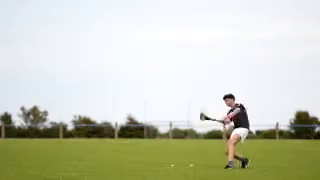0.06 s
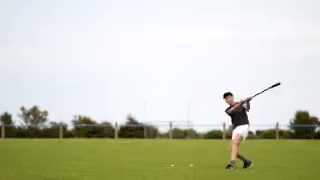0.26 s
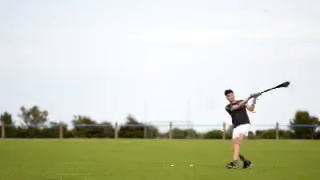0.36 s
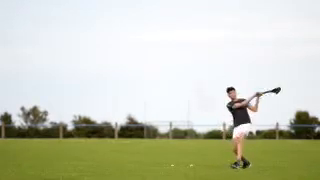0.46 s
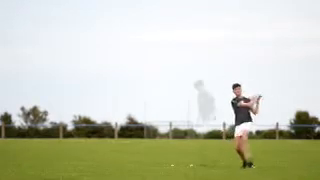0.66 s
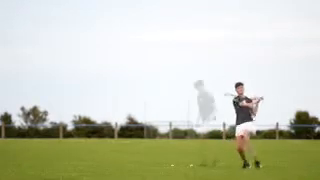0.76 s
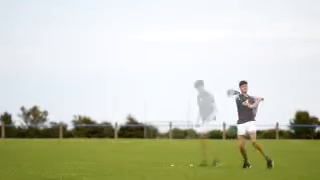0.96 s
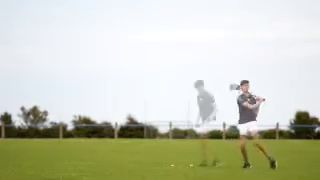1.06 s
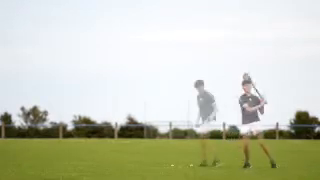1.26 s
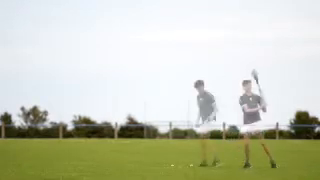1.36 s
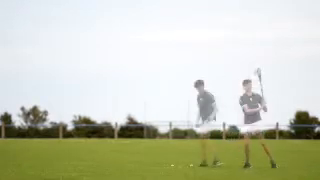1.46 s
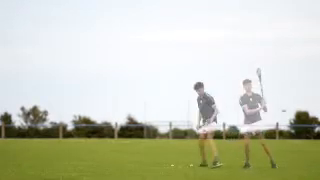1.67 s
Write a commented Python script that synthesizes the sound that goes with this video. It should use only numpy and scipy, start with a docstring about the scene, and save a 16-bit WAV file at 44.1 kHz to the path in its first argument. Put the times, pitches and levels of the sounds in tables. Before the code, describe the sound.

On an open field, a loud, close crack sounds as a stick strikes a ball, trailed by small ticks and a soft swish of echo. A faint breeze continues, now and then rumbling on the microphone.

```python
"""Stick and ball on an open field

Close to the microphone, a wooden stick swings and hits a ball. The dry crack, a sharp pulse with a
brief ring of wood, comes twice in quick succession. Ticks, soft knocks and steps follow on the grass,
and the far hedge scatters the crack back as a soft swish. Light wind blows throughout and now and
then buffets the microphone."""
import sys
import numpy as np
from scipy import signal
from scipy.fft import rfft, irfft
from scipy.io import wavfile

SR = 44100
rng = np.random.default_rng(int(sys.argv[2]) if len(sys.argv) > 2 else 0)


def store_wav(level_fs):
    """Save 16-bit WAV to argv[1]."""
    pcm = np.round(np.clip(np.atleast_2d(level_fs), -1, 1) * 32767)
    wavfile.write(sys.argv[1], SR, pcm.T.astype(np.int16))


N = 74970

# Colours of the wind. Each row: frequency in Hz, relative level in dB.
AIR_SPECTRUM = [(20, -16), (60, -1.5), (120, -4.5), (190, -10), (320, -7.5), (500, -13), (800, -15.5),
                (1250, -12), (1700, -18), (2600, -18.5), (3800, -20.5), (6000, -23), (7200, -33),
                (8500, -35.5), (11000, -32.5), (15200, -34.5), (16000, -55.5)]
SWELL_SPECTRUM = [(150, -19), (500, 1.5), (1300, 0), (2200, -29), (6000, -27)]
BUFFET_SPECTRUM = [(15, -14), (35, -4), (55, 1.5), (90, -3.5), (150, -10), (250, -22.5), (600, -47),
                   (3000, -88)]
# How alike the wind is on both sides. Each row: frequency in Hz, left-right correlation.
AIR_LIKENESS = [(30, .3), (120, 0.6), (300, .8), (600, 0.7), (1200, .2), (4000, 0.039), (15000, .1)]
# Strength of the breeze. Each row: time in seconds, gain in dB.
BREEZE_CURVE = [(0, 1), (.6, 1.5), (1, 2), (1.1, 1.5), (1.35, 0.5), (1.55, 0.5), (1.7, 2)]
# Wind on the microphone. Each row: centre and half length in seconds, level and left minus right in dB.
MIC_BUFFETS = [(0.122, 0.02, -63, 30), (0.342, 0.023, -60, -5.5), (0.444, 0.0093, -48, 20),
               (0.586, 0.012, -54, -31), (0.698, 0.022, -49, -22), (0.798, 0.014, -63, -12),
               (1.28, .015, -56.5, 3), (1.447, 0.048, -55.5, -24), (1.631, 0.058, -62.5, 2)]
# Colours of the close sounds. Each row: frequency in Hz, relative level in dB.
WHOOSH_SPECTRUM = [(40, -11), (90, -5), (150, -1), (260, -3), (500, -19), (1500, -36), (8000, -62.5)]
CONTACT_SPECTRUM = [(40, 0.5), (220, 9.5), (400, 7), (620, 0), (900, -12), (1300, -2.5), (1700, 5),
                    (2400, 13.5), (3300, 20), (4300, 11.5), (5200, 18), (6600, 15), (8400, 6.5),
                    (10500, -2.5), (12600, -12.5), (14200, -24.5), (16000, -35)]
SNAP_SPECTRUM = [(1000, -34), (3800, -21), (4700, -1), (6500, 3), (8500, -8), (12000, -9), (15000, -27)]
SCUFF_SPECTRUM = [(200, -24), (500, 7), (900, -6), (2000, 5.5), (3600, 2), (5000, 1), (6500, -5.5),
                  (9000, -14), (15000, -30)]
# Stereo lean of the crack. Each row: frequency in Hz, left minus right in dB.
CONTACT_BALANCE = [(100, 3.5), (2000, -0.5), (3600, 2.5), (5200, 2.5), (6300, -4.5), (8500, 0), (10300, 8),
                   (11800, 11), (14000, -3)]
# High pings. Each row: centre in seconds, pitch in Hz, half length in seconds, level in dB,
# left minus right in dB.
HIGH_PINGS = [(.2515, 5450, .0011, -36.5, -4), (1.536, 4750, 0.0013, -52, -4)]
# Ticks and snaps. Each row: time in seconds, level in dB, left minus right in dB.
SHARP_TICKS = [(0.2585, -27, -11), (.2727, -26, 10.5)]
BRIGHT_SNAPS = [(0.331, -52, -4), (0.486, -53.5, 3), (.501, -50, 14), (1.536, -61, -3.5)]
# Colours of the hedge's swish and its bright front. Each row: frequency in Hz, relative level in dB.
SWISH_SPECTRUM = [(150, 4), (400, 0), (900, -0.5), (1600, 0), (2600, 3), (4300, 3.5), (5400, 7), (6700, -1),
                  (8500, -10), (11000, -18), (15000, -33)]
SIZZLE_SPECTRUM = [(1000, -35), (4400, -10), (5300, 6), (6600, 3), (8500, -14.5), (10500, -24),
                   (15000, -38)]
# Returns from the hedge. Each row: start, rise and time to fall 60 dB, all in seconds, then level in dB.
HEDGE_ECHOES = [(0.284, 0.01, 0.49, -55.5), (0.384, 0.07, 0.98, -48), (0.691, 0.026, 0.23, -56.5)]
# Low knocks. Each row: centre in seconds, level in dB.
SOFT_KNOCKS = [(0.3474, -35), (.355, -47), (0.362, -48), (0.3773, -47), (0.3989, -45), (0.4167, -43.5)]
# Scuffs on the grass. Each row: centre and half length in seconds, level in dB.
GRASS_SCUFFS = [(0.347, .0015, -44), (1.391, 0.02, -59)]
# The player's steps. Each row: centre and half length in seconds, level and left minus right in dB.
STEPS = [(0.696, .016, -49, -19), (1.196, .012, -54, -12)]

TIME, FREQS = np.arange(N) / SR, np.fft.rfftfreq(N, 1 / SR)


def amp(db):
    return 10 ** (np.asarray(db) / 20)


def unit_rms(x):
    return x / np.sqrt(np.mean(x ** 2) + 1e-20)


def curve_at(points, hz):
    """Joins points on a log-frequency axis."""
    freqs, values = np.transpose(points)
    return np.interp(np.log(hz + 1), np.log(freqs + 1), values)


def pan(db):
    """Left and right gains of constant power."""
    return unit_rms(amp([[db / 2], [-db / 2]]))


def add(mix, start_s, sound):
    part = mix[:, round(start_s * SR):][:, :sound.shape[1]]
    part += sound[:, :part.shape[1]]


def bell(centre_s, width_s):
    return np.exp(-((TIME - centre_s) / width_s) ** 2 / 2)


def blip(centre_s, hz, width_s, db):
    """A cosine under a bell-shaped envelope."""
    return -amp(db) * bell(centre_s, width_s) * np.cos(2 * np.pi * hz * (TIME - centre_s))


def drift(seconds):
    """Smooth random wander of rms 1."""
    smoothing = np.exp(-(FREQS * seconds) ** 2) * (FREQS > 0)
    return unit_rms(irfft(rfft(rng.standard_normal(N)) * smoothing, N))


def noise(spectrum, likeness):
    """Stereo noise of a given colour and left-right correlation."""
    left, other = rfft(rng.standard_normal((2, N)))
    right = likeness * left + np.sqrt(1 - likeness ** 2) * other
    return unit_rms(irfft(np.array([left, right]) * amp(curve_at(spectrum, FREQS)), N))


def notch(x, hz, width_hz):
    return signal.lfilter(*signal.iirnotch(hz, hz / width_hz, SR), x)


def wind():
    """Light air over the open field, with one soft swell late on."""
    level_db = -58 + np.interp(TIME, *np.transpose(BREEZE_CURVE)) + .75 * drift(.02)
    air = amp(level_db) * noise(AIR_SPECTRUM, curve_at(AIR_LIKENESS, FREQS))
    swell = amp(-61) * bell(1.506, width_s=.15) * noise(SWELL_SPECTRUM, likeness=.31)
    return air + swell


def whir(hz=2026, width_hz=120):
    """A thin, distant whir: a narrow band of noise whose level flutters."""
    peak = 1 + ((FREQS - hz) / width_hz) ** 2
    band = unit_rms(irfft(rfft(rng.standard_normal((2, N))) / peak, N))
    return band * pan(-3) * amp(-62.5 + 2.2 * drift(.018))


def buffets():
    """Puffs of wind hit the microphone and rumble, mostly on one side."""
    push = sum(pan(pan_db) * amp(db) * bell(s, width) for s, width, db, pan_db in MIC_BUFFETS)
    return push * noise(BUFFET_SPECTRUM, likeness=0)


def whoosh():
    """The swinging stick pushes a low rush of air past the microphone."""
    return amp(-57) * bell(.25, width_s=.064) * noise(WHOOSH_SPECTRUM, likeness=.91)


def reflections(db, t60_s, size=8192):
    """A dying burst of random reflections, half its power common to both sides."""
    t = np.arange(size) / SR
    scatter = rng.standard_normal(size) + rng.standard_normal((2, size))
    decay = amp(-60 * t / t60_s) * (t > .0007)
    return amp(db) * unit_rms(scatter * decay) / np.sqrt(size)


def crack(size=4096):
    """One sharp contact pulse, with the ring of the wood and scatter from the grass near by."""
    hz = abs(np.fft.fftfreq(size, 1 / SR))
    lean_db = np.outer([.5, -.5], curve_at(CONTACT_BALANCE, hz))
    log_gain = np.log(amp(curve_at(CONTACT_SPECTRUM, hz) + lean_db))
    # Minimum phase gives the sharpest causal pulse with this spectrum.
    contact = np.fft.ifft(np.exp(np.conj(signal.hilbert(log_gain)))).real
    contact = notch(contact, hz=4400, width_hz=520)
    wood = reflections(db=-9.5, t60_s=.011)
    grass = reflections(db=-25.5, t60_s=.13)
    response = wood + grass
    response[:, 0] += 1  # the direct sound
    return signal.fftconvolve(contact, response, axes=1)


def strike(hit_s=.22848, repeat_s=.01275):
    """Stick meets ball, close up: two cracks, each with the ball's dull push just after contact."""
    out, blow = np.zeros((2, N)), amp(-2) * crack()
    for s in (hit_s, hit_s + repeat_s):
        add(out, s, blow)
        out += blip(s + .0014, hz=380, width_s=.0005, db=-34.5)
    return out


def pings():
    """Two brief high tones, one just after the strike and one late."""
    return sum(pan(pan_db) * blip(s, hz, width, db) for s, hz, width, db, pan_db in HIGH_PINGS)


def ticks():
    """Two much smaller cracks, right then left."""
    out = np.zeros((2, N))
    for s, db, pan_db in SHARP_TICKS:
        add(out, s, amp(db) * pan(pan_db) * crack())
    return out


def hedge_swish(likeness=.18, grain_db=2):
    """The far hedge scatters the crack back as grainy, diffuse hiss with a bright front."""
    power = np.zeros(N)
    for start, rise, t60, db in HEDGE_ECHOES:
        build = np.clip((TIME - start) / rise, 0, 1)
        fall_db = 60 * np.maximum(TIME - start - rise, 0) / t60
        power += build * amp(db - fall_db) ** 2
    hiss = np.sqrt(power) * noise(SWISH_SPECTRUM, likeness)
    sizzle = amp(-56) * bell(.432, width_s=.033) * noise(SIZZLE_SPECTRUM, likeness)
    grain = unit_rms(amp(grain_db * drift(.002)))
    return (hiss + sizzle) * grain


def snaps():
    """Tiny bursts of bright noise to either side."""
    bursts = sum(amp(db) * pan(pan_db) * bell(s, width_s=.001) for s, db, pan_db in BRIGHT_SNAPS)
    return bursts * noise(SNAP_SPECTRUM, likeness=.23)


def knocks():
    """A quick run of dull knocks in the follow-through."""
    return sum(blip(s, hz=360, width_s=.0011, db=db) for s, db in SOFT_KNOCKS)


def scuffs():
    """Two light brushes on the grass."""
    envelope = sum(amp(db) * bell(s, width) for s, width, db in GRASS_SCUFFS)
    return envelope * noise(SCUFF_SPECTRUM, likeness=.2)


def steps(hz=72):
    """Deep, soft thumps on the right as the player steps out of the swing."""
    return sum(pan(pan_db) * blip(s, hz, width, db) for s, width, db, pan_db in STEPS)


def scene():
    """The field as heard from beside the player."""
    background = wind() + whir() + buffets()
    stroke = whoosh() + strike() + pings() + ticks()
    return background + stroke + hedge_swish() + snaps() + knocks() + scuffs() + steps()


def record(dry, band_limit_hz=15550):
    """The recorder: two narrow dips in the treble, a ceiling at full scale and a band limit."""
    for hz in (7660, 9600):
        for _ in range(2):
            dry = notch(dry, hz, width_hz=540)
    clipped = np.clip(dry, -1, 1)
    lowpass = signal.firwin(255, band_limit_hz, window=("kaiser", 9), fs=SR)
    return signal.oaconvolve(clipped, lowpass[None], "same")


dry = scene()
out = record(dry)
store_wav(out)
```